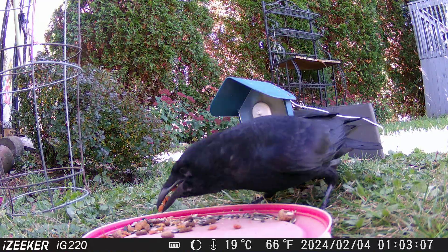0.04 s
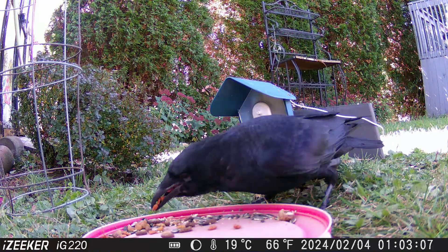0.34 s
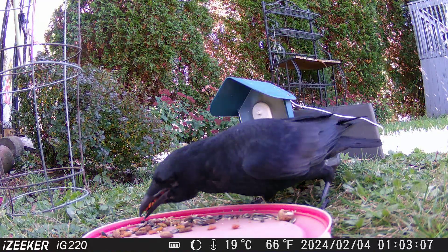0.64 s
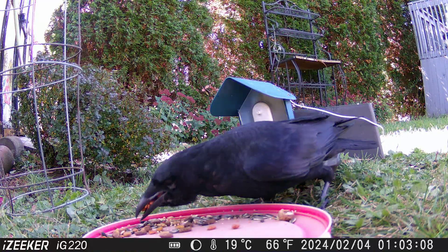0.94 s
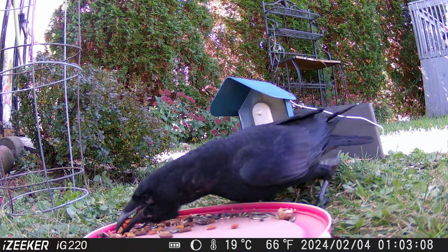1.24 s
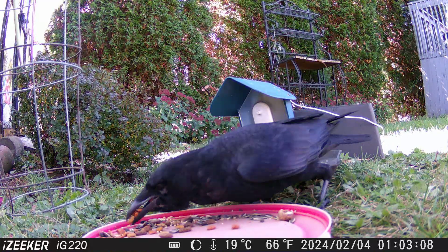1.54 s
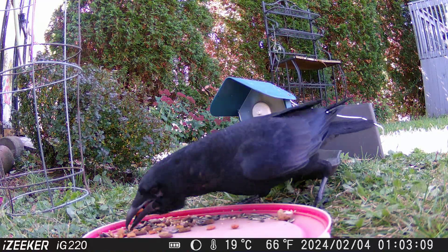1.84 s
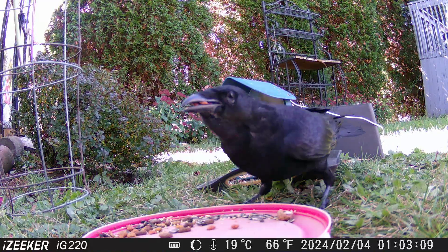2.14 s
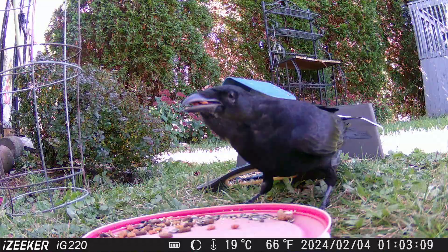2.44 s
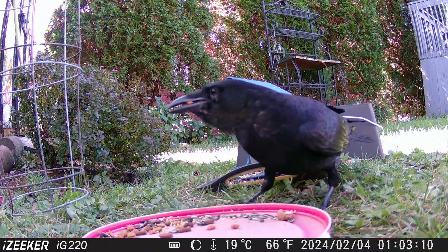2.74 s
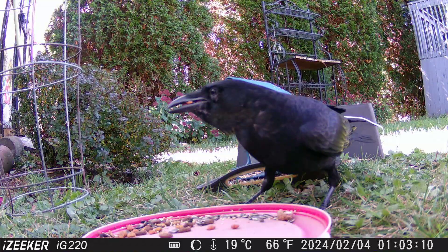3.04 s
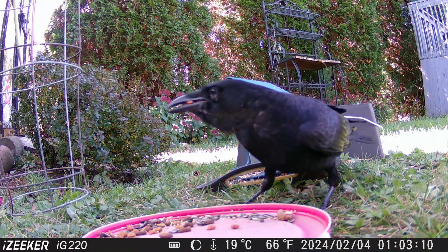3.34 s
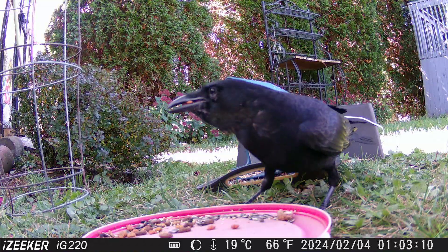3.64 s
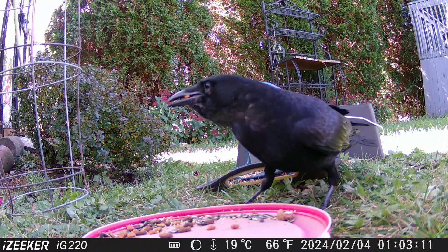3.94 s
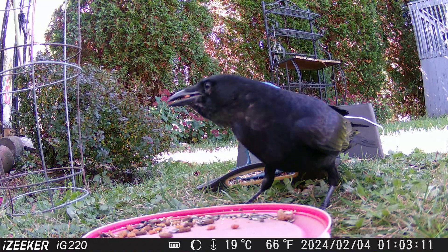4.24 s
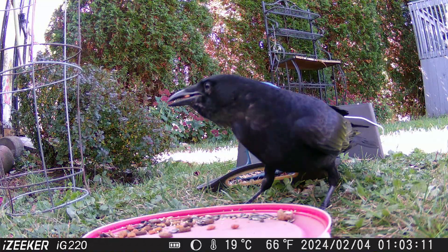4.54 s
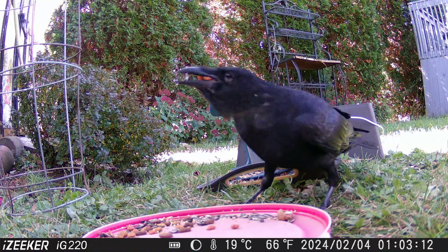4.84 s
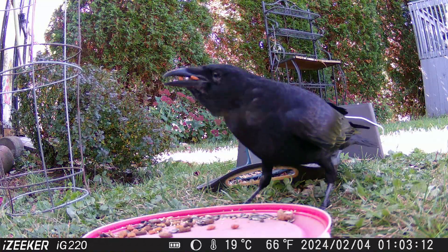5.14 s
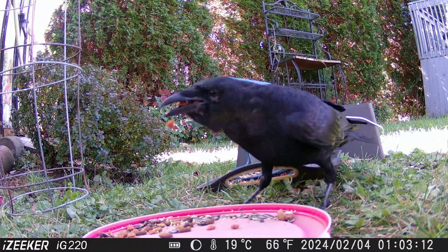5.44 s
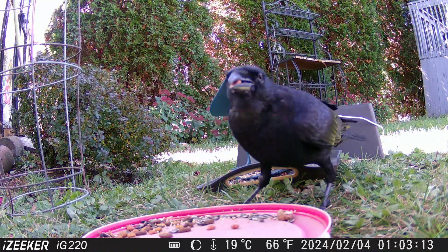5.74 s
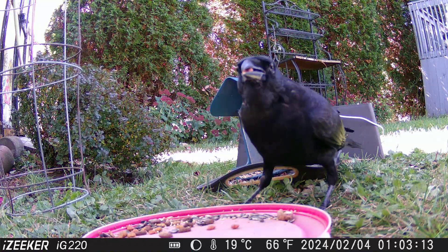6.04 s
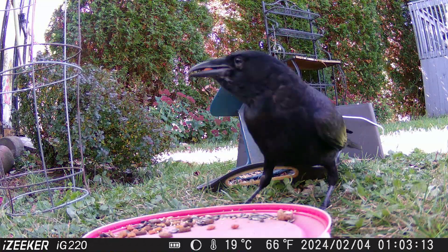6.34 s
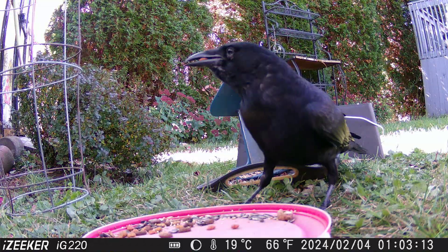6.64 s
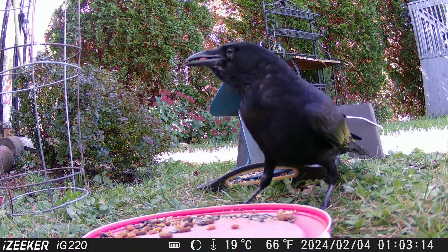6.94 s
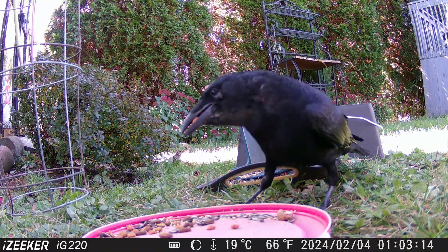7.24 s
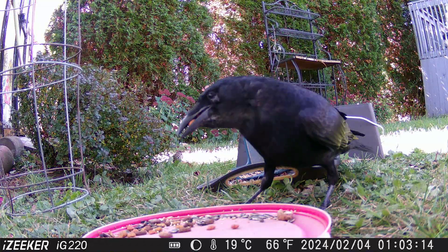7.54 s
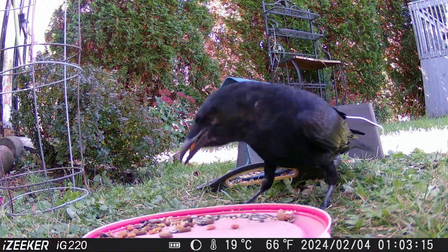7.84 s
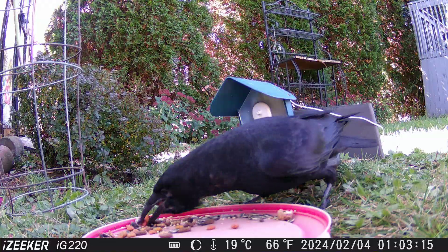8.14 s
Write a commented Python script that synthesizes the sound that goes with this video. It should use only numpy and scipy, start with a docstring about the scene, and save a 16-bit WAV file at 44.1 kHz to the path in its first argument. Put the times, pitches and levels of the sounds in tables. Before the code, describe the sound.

Close, hollow thumps strike the plastic housing of the microphone at uneven intervals, more often in the second half. Between them a crow's beak snaps and crunches through dry feed in a plastic dish, busily at first, then sparsely, setting off tiny clicks. Behind it in the yard lie a steady far-off town murmur, a faint hiss and a few barely audible bird chirps.

```python
"""Crumbs tick and a dull knock sounds over a distant town murmur and a microphone's faint hiss.
A crow is picking seeds and pellets from a plastic dish on a lawn, right in front of a small camera.
Its beak snaps pieces and crunches through the feed, setting off showers of tiny clicks.
The knocks, perhaps falling drips, shake the camera's plastic case and make it ring.
A few thin bird chirps come from far away."""
import sys
import numpy as np
from scipy import signal
from scipy.io import wavfile
from scipy.ndimage import uniform_filter1d

SR = 44100
rng = np.random.default_rng(int(sys.argv[2]) if len(sys.argv) > 2 else 0)


def transcribe(signal):
    """Save signal, clipped to [-1, 1], as a 16-bit WAV file at the path in sys.argv[1]."""
    frames = np.atleast_2d(signal).T
    limited = np.clip(frames, -1, 1)
    pcm = np.round(limited * 32767).astype(np.int16)
    wavfile.write(sys.argv[1], SR, pcm)


N = 365148
TAPS = 8192  # samples in one short sound
HZ = np.fft.rfftfreq(TAPS, 1 / SR)  # the pitches in its spectrum
AGE = np.arange(TAPS) / SR  # seconds since it began


def amp(db):
    """Turns decibels into a gain."""
    return 10 ** (np.asarray(db) / 20)


def unit(x):
    """Scales a sound to an average (rms) level of one."""
    return x / np.sqrt(np.mean(x ** 2) + 1e-20)


def with_energy(x, seconds):
    """Gives a sound the energy of a level of one held for that long."""
    return x * np.sqrt(seconds * SR / (np.sum(x ** 2) + 1e-20))


def curve(points, hz=HZ):
    """Joins (pitch_hz, level_db) points into a spectrum: a level for every pitch."""
    pitch_hz, level_db = np.transpose(points)
    return np.interp(np.log(hz + 1), np.log(pitch_hz + 1), level_db)


def add(mix, start_s, sound):
    """Lays a sound into the mix at its start time."""
    part = mix[max(round(start_s * SR), 0):][:len(sound)]
    part += sound[:len(part)]


def bump(pitch_hz, width_hz):
    """The bell shape of one resonance, a pitch at which an object likes to ring."""
    return 1 / (1 + (2 * (HZ - pitch_hz) / width_hz) ** 2)


def ripple(width_hz):
    """Small random resonances: each point of contact has its own."""
    knots = np.arange(0, SR / 2, width_hz)
    return np.interp(HZ, knots, rng.standard_normal(1024)[:len(knots)])


def ring(spectrum_db):
    """How an object with this spectrum rings after one sharp tap."""
    log_gain = np.log(amp(np.maximum(spectrum_db, -100)))
    mirrored = np.concatenate([log_gain, log_gain[-2:0:-1]])
    spectrum = np.exp(np.conj(signal.hilbert(mirrored)))  # puts all the ringing after the tap
    return np.fft.ifft(spectrum).real


def strike(force, spectrum_db):
    """The sound of a force shaking an object with this spectrum."""
    return signal.fftconvolve(force, ring(spectrum_db))


def rattle(rise_s, fade_s):
    """A brief rattling contact: noise that builds quickly and falls 60 dB in fade_s."""
    envelope = (1 - np.exp(-AGE / rise_s)) * np.exp(-np.log(1000) * AGE / fade_s)
    return rng.standard_normal(TAPS) * envelope


def grains(size, per_s, spread_db):
    """Up to two seconds of random tiny contacts, most of them weak and a few strong."""
    most = 2 * SR
    heights = amp(spread_db * np.minimum(rng.exponential(1, most)[:size], 3))
    signs = rng.choice([-1, 1], most)[:size]
    return heights * signs * (rng.random(most)[:size] < per_s / SR)


def wash(colour, patchy_db):
    """Steady noise whose level drifts in small patches of time and pitch."""
    hz, _, spectra = signal.stft(rng.standard_normal(N), SR, nperseg=2048)
    patches = uniform_filter1d(rng.standard_normal(spectra.shape), size=12, axis=0)
    patches = unit(uniform_filter1d(patches, size=6, axis=1))
    gain = amp(curve(colour, hz)[:, None] + patchy_db * patches)
    return unit(signal.istft(spectra * gain, SR)[1][:N])


def town_murmur(level_db=-49, bass_hz=200):
    """Distant traffic: a steady murmur whose bass swells a little."""
    # tone of the traffic: pitch_hz, level_db
    colour = [(12, -28), (20, 1), (54, -4.5), (82, -3.5), (120, -5), (161, -11), (231, -13.5), (381, -20),
              (436, -17.5), (523, -21), (599, -20), (921, -19.5), (1260, -30.5), (3510, -51.5), (4500, -64),
              (5850, -87), (9900, -120)]
    # slow swell of its bass: time_s, lift_db
    swell = [(0, 2), (1, 0), (4.4, 0.5), (6, 0.9), (8.28, 3.5)]
    traffic = amp(level_db) * wash(colour, patchy_db=0.69)
    bass = signal.sosfiltfilt(signal.butter(2, bass_hz, fs=SR, output="sos"), traffic)
    lift_db = np.interp(np.arange(N) / SR, *np.transpose(swell))
    return traffic + bass * (amp(lift_db) - 1)


def microphone_hiss(level_db=-87):
    """The microphone's own faint, high noise."""
    # tone of the hiss: pitch_hz, level_db
    colour = [(3500, -18.5), (4700, -10.5), (5500, -9), (6300, 0), (7100, 2.5), (7900, 0), (8500, -13),
              (9000, -29)]
    return amp(level_db) * wash(colour, patchy_db=1)


def dry_feed(force, seconds, ring_hz, body_db, fizz_db, ripple_db=1, lift_db=6):
    """Dry feed hits the dish: the same contacts make a hollow body of sound and a fine fizz."""
    # tone of the hollow body: pitch_hz, level_db
    body_colour = [(150, -17), (500, 5), (1100, 1), (1600, 5), (2200, 1.5), (3000, -3.5), (4000, -13.5),
                   (4800, -26), (9000, -62)]
    # tone of the fizz: pitch_hz, level_db
    fizz_colour = [(2000, -28), (3800, -7.5), (4800, -8.5), (5600, -0.5), (6300, 3), (7100, 9.5), (8100, 0),
                   (9000, -18)]
    spot_db = ripple_db * ripple(width_hz=261.6) + lift_db * bump(ring_hz, width_hz=650)
    body = with_energy(strike(force, curve(body_colour) + spot_db), seconds)
    fizz = with_energy(strike(force, curve(fizz_colour) + spot_db), seconds)
    return amp(body_db) * body + amp(fizz_db) * fizz


def crumbs(ring_hz=2000, clump_s=0.061, clump_spread_db=7.5):
    """Loose crumbs shift and tick in clumps while the beak rummages or works its food."""
    # busy spells, each sounding for two seconds at most: start_s, length_s, body_db, fizz_db
    spells = [(0, 0.083, -62.5, -74), (.55, 0.95, -81, -88.5), (1.674, .3, -76, -84),
              (2.849, 0.77, -80.5, -82.5), (3.749, 3.8, -86, -95.5), (5.316, .55, -76.5, -86),
              (8.157, 0.14, -88, -74)]
    out = np.zeros(N)
    for start_s, length_s, body_db, fizz_db in spells:
        t = np.arange(0, min(length_s, 2), 1 / SR)
        clump_gains = amp(clump_spread_db * np.clip(rng.standard_normal(TAPS), -2, 2))
        contacts = clump_gains[(t / clump_s).astype(int)] * grains(len(t), per_s=480, spread_db=5)
        ticks = signal.fftconvolve(contacts, rattle(rise_s=0.0005, fade_s=0.011))
        add(out, start_s, dry_feed(ticks, length_s, ring_hz, body_db, fizz_db))
    return out


def knocks(panel_hz=456, upper_hz=2900, fade_s=0.026):
    """Each blow pushes the whole camera case, rings the panel that it hits, and rattles briefly."""
    # blows: start_s, thud_db, freedom (how freely the whole case rings, 0-1), local_hz, panel_db,
    # clack_hz, clack_db, hardness_db, tick_db
    blows = [(0.0719, -29, 1, 80, 5.5, 720, -33.5, 0.5, -47.5),
             (1.0179, -36, 0.88, 80, 9.5, 746, -50.5, -16, -79),
             (1.1276, -28, 0.64, 84, 20.5, 1344, -36, 4, -51.5),
             (1.9684, -39, 0.87, 129, 12, 1270, -58, -20, -97),
             (2.0957, -24.5, 1, 80, 9, 1460, -35, -8, -54.5),
             (3.7095, -38, 0.8, 195, 6.5, 860, -54, -39, -82),
             (4.0182, -28, 0.34, 164, -4, 800, -38.5, 1.5, -69.5),
             (4.8228, -22.5, 0.66, 244, -3, 917, -37, -3.5, -70),
             (5.377, -32.5, 0.97, 80, 12.5, 1380, -43, -16, -60),
             (5.7183, -33, 0.8, 198, 2, 1200, -47, -6, -88),
             (6.318, -30, 0.62, 227, 0.5, 1550, -50, -14, -76),
             (6.5579, -26.5, 0.76, 194, 5.5, 1840, -39.5, -20.5, -70),
             (6.898, -29, 0.72, 230, -8.5, 1780, -47.5, -11, -81),
             (7.25, -27, 0.6, 204, 8.5, 890, -46, 8.5, -76),
             (7.7026, -32.5, 0.52, 217, 21.5, 1160, -46, 0, -76),
             (8.1062, -31.5, 0.18, 156, 2, 1280, -43.5, 3, -71)]
    # broad tone of the case: pitch_hz, level_db
    case_colour = [(20, -50), (48, -11), (72, -4), (150, 1), (260, 2.5), (400, -7), (540, -7), (640, -32),
                   (1100, -41), (2000, -37), (4000, -76), (9000, -70)]
    # its resonances and dips: pitch_hz, width_hz, lift_db
    resonances = [(80, 18, 14), (141.4, 14, 5.5), (176.7, 16, -14), (200, 25.5, 7.5), (409, 10, -8.5)]
    # tone of the hard contact: pitch_hz, level_db
    clack_colour = [(200, -11), (500, 0), (750, 4.5), (1400, 4.5), (1900, -5), (2300, -10), (3200, -23.5),
                    (4600, -36.5), (9000, -50)]
    # tone of its high tick: pitch_hz, level_db
    tick_colour = [(1500, 2), (3000, -10), (4700, -11.5), (5600, -1.5), (7300, 7), (8200, -1.5),
                   (9000, -37.5)]
    out = np.zeros(N)
    resonance_db = sum(db * bump(hz, width_hz) for hz, width_hz, db in resonances)
    for start_s, thud_db, freedom, local_hz, panel_db, clack_hz, clack_db, hardness_db, tick_db in blows:
        # the less the whole case rings, the more the struck spot does
        spot_db = (1 - freedom) * 15 * bump(local_hz, width_hz=93)
        spot_db += panel_db * bump(panel_hz, width_hz=170)
        spot_db += 3 * ripple(width_hz=87) * np.minimum(HZ / 600, 1)
        thud = -ring(curve(case_colour) + freedom * resonance_db + spot_db)
        add(out, start_s, amp(thud_db) * with_energy(thud, seconds=0.026))
        wall_db = curve(clack_colour) + 10 * bump(clack_hz, width_hz=260)
        # a harder contact reaches the wall's upper resonances
        wall_db += (hardness_db + 6) * bump(upper_hz, width_hz=1300)
        clack = strike(rattle(rise_s=0.0016, fade_s=fade_s), wall_db)
        add(out, start_s, amp(clack_db) * with_energy(clack, seconds=0.033))
        tick = strike(rattle(rise_s=0.00057, fade_s=fade_s), curve(tick_colour))
        add(out, start_s, amp(tick_db) * with_energy(tick, seconds=0.026))
    return out


def snaps(trim_db=-1, energy_s=0.0072):
    """A seed cracks or the beak shuts: one sharp click and a few milliseconds of rattle."""
    # single snaps: start_s, ring_hz, body_db, fizz_db (levels before trim_db)
    cracks = [(0.1061, 1580, -55, -53.5), (0.1495, 2240, -62, -104), (0.511, 2900, -46, -58),
              (0.522, 2860, -43.5, -60), (0.6148, 1990, -44, -54.5), (0.667, 2020, -63, -87),
              (0.845, 1830, -34, -77), (1.022, 1400, -77, -60.5), (1.2892, 1690, -50, -67),
              (1.309, 1740, -50, -52.5), (1.348, 1670, -55.5, -70), (1.415, 2050, -61, -90),
              (1.662, 3300, -39, -58), (1.772, 2310, -63, -89), (1.8656, 1720, -51, -63),
              (1.991, 2070, -61, -67), (2.8012, 1300, -36, -48), (2.819, 1310, -49, -63.5),
              (2.8695, 1900, -55.5, -66), (3.696, 1450, -69, -66), (5.107, 2090, -61, -75),
              (5.266, 1300, -57, -73), (5.372, 1420, -64, -60), (5.4067, 1960, -59.5, -63),
              (5.6275, 2000, -39, -51), (5.6301, 3450, -41, -43.5), (5.736, 1730, -47, -57),
              (5.754, 1850, -49, -61), (5.799, 2020, -57.5, -65)]
    out = np.zeros(N)
    click = 5.2 * (AGE == 0)
    for start_s, ring_hz, body_db, fizz_db in cracks:
        force = click + rattle(rise_s=0.00098, fade_s=0.021)
        add(out, start_s, dry_feed(force, energy_s, ring_hz, body_db, fizz_db, ripple_db=3, lift_db=8.5))
    return amp(trim_db) * out


def crunches(trim_db=-1, rise_s=0.0028, release_s=0.0043, dish_hz=142, dish_fade_s=0.44):
    """A shove of the beak bumps the dish and sets off a shower of seeds that brightens, then settles."""
    # shoves through the feed: start_s, length_s, rasp_hz, body_db, fizz_db (levels before trim_db)
    shoves = [(0.517, 0.028, 2650, -40.5, -53), (0.832, 0.037, 1880, -43.5, -57.5),
              (1.005, 0.018, 1460, -61, -66), (1.283, 0.035, 1690, -43.5, -56),
              (1.662, 0.026, 2060, -44, -54.5), (1.722, 0.016, 3200, -59, -65.5),
              (1.86, 0.041, 1770, -58.5, -68.5), (1.933, 0.012, 2680, -70, -63),
              (3.619, 0.019, 1460, -66, -69.5), (3.885, 0.02, 1420, -64.5, -74.5),
              (4.341, 0.017, 1490, -80, -74.5), (4.903, 0.021, 1640, -66, -75.5),
              (8.152, 0.026, 2250, -43.5, -63.5)]
    out = np.zeros(N)
    dish = np.sin(2 * np.pi * dish_hz * AGE) * np.exp(-np.log(1000) * AGE / dish_fade_s)
    for start_s, length_s, rasp_hz, body_db, fizz_db in shoves:
        after_s = np.maximum(AGE - length_s, 0)
        shower = grains(TAPS, per_s=1000, spread_db=3)
        rubbing = 0.1 * rng.standard_normal(TAPS)
        # disturbed seeds trickle back, fading 146 dB a second once the shove ends
        trickle = grains(TAPS, per_s=650, spread_db=3) * amp(-12.5 - 146 * after_s)
        shove = (shower + rubbing) * np.exp(-after_s / release_s)
        force = np.minimum(AGE / rise_s, 1) * (shove + trickle)
        progress = np.minimum(AGE / length_s, 1)
        # as the shove goes on, body gives way a little to fizz
        for share, bright_db in ((1 - progress, -0.5), (progress, 0.5)):
            levels_db = (body_db - bright_db / 2, fizz_db + bright_db)
            add(out, start_s, amp(trim_db) * dry_feed(force * share, length_s / 3, rasp_hz, *levels_db))
        add(out, start_s, amp(body_db - 10) * dish)
    return out


def chirps():
    """Small birds far away give thin, falling whistles."""
    # whistles: start_s, length_s, start_hz, end_hz, level_db
    whistles = [(1.224, 0.056, 3640, 3540, -92), (2.304, 0.063, 3620, 3440, -86),
                (7.572, 0.024, 6700, 6400, -77)]
    out = np.zeros(N)
    for start_s, length_s, start_hz, end_hz, level_db in whistles:
        pitch_hz = np.linspace(start_hz, end_hz, int(length_s * SR))
        tone = np.sin(2 * np.pi * np.cumsum(pitch_hz) / SR)
        add(out, start_s, amp(level_db) * unit(tone * np.hanning(len(tone))))
    return out


def yard(sound, echo_db):
    """Adds the faint echoes that scatter back from lawn, hedge and wall."""
    echoes = with_energy(rattle(rise_s=0.013, fade_s=0.17), seconds=1 / SR)
    return sound + amp(echo_db) * signal.fftconvolve(sound, echoes)[:N]


def scene():
    """The near feeding and knocking over the background, in one channel."""
    feeding = yard(crunches() + snaps() + crumbs(), echo_db=-29)
    knocking = yard(knocks(), echo_db=-26)
    return (feeding + knocking + microphone_hiss() + town_murmur() + chirps())[None]


def record(dry):
    """The camera cuts off the treble above 8800 Hz."""
    low_pass = signal.firwin(255, 8800, window=("kaiser", 8), fs=SR)
    return signal.oaconvolve(dry, low_pass[None], "same")


dry = scene()
out = record(dry)
transcribe(out)
```